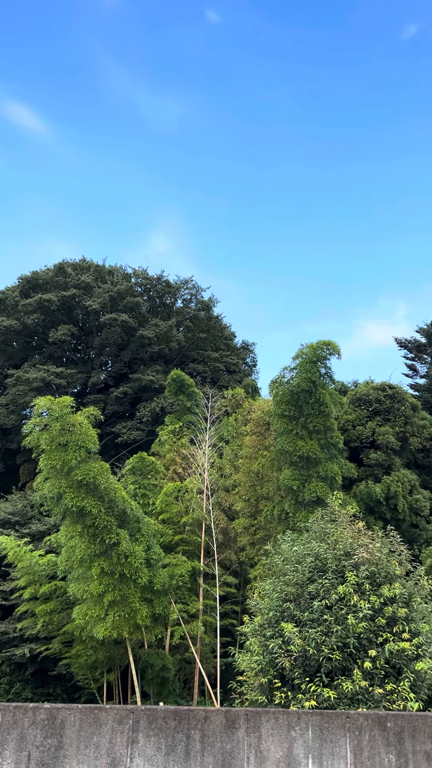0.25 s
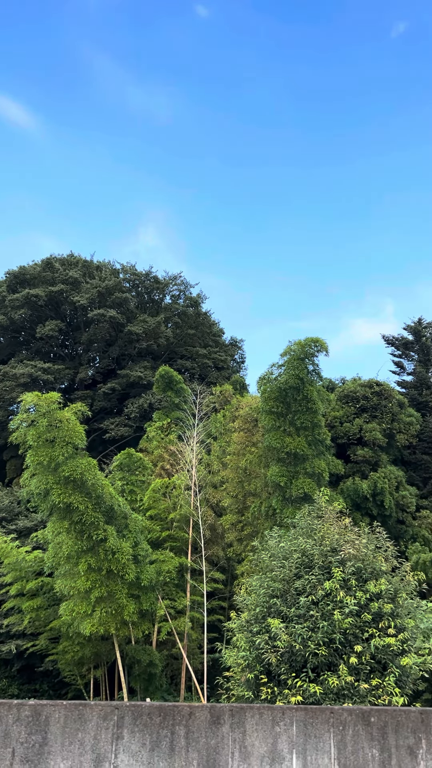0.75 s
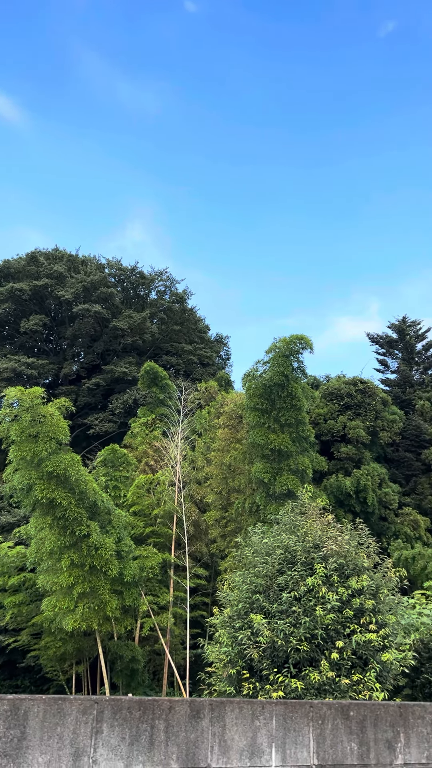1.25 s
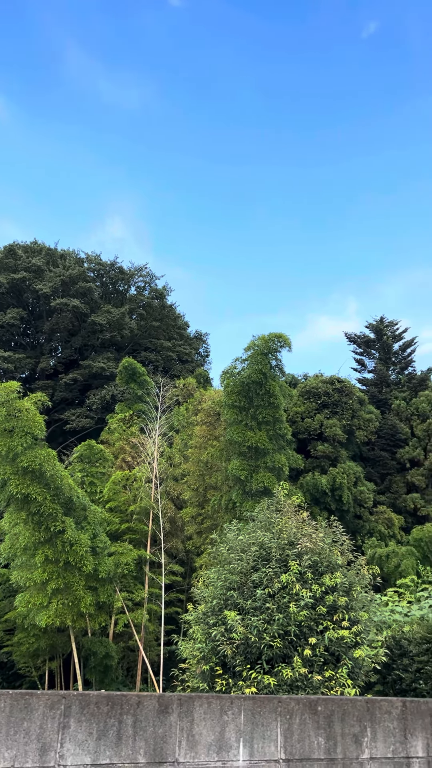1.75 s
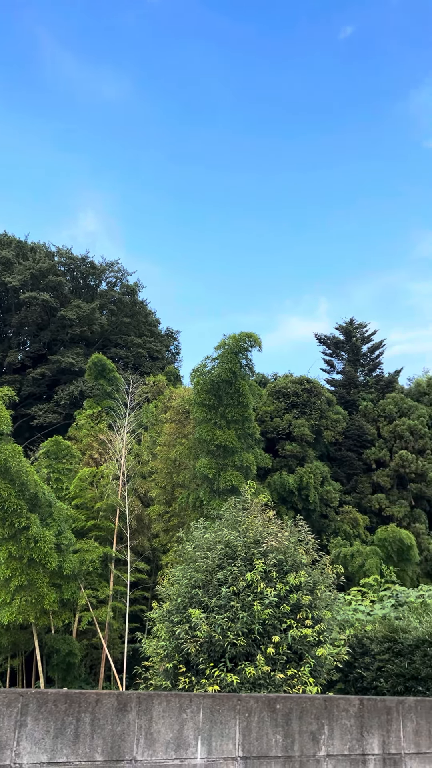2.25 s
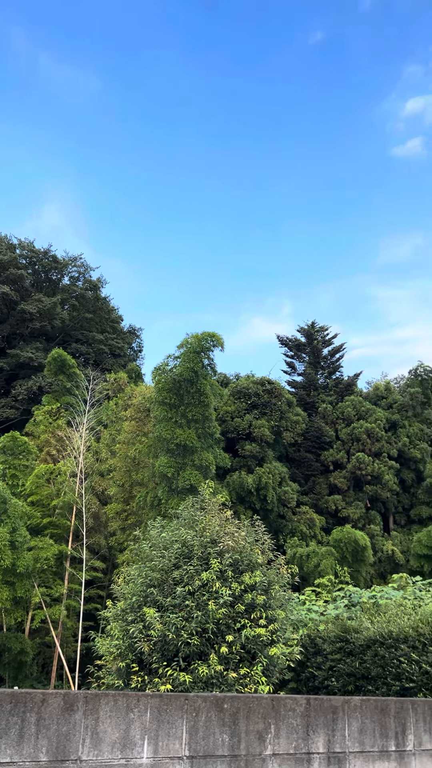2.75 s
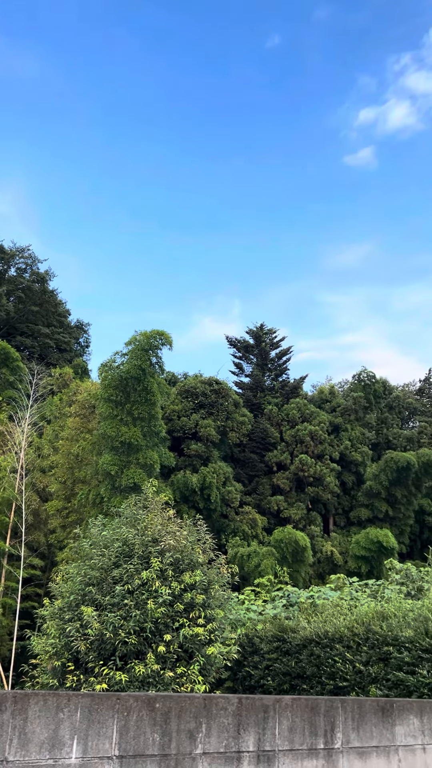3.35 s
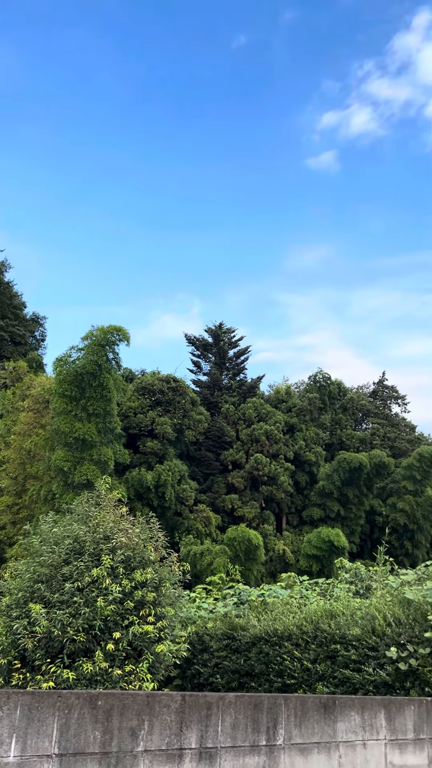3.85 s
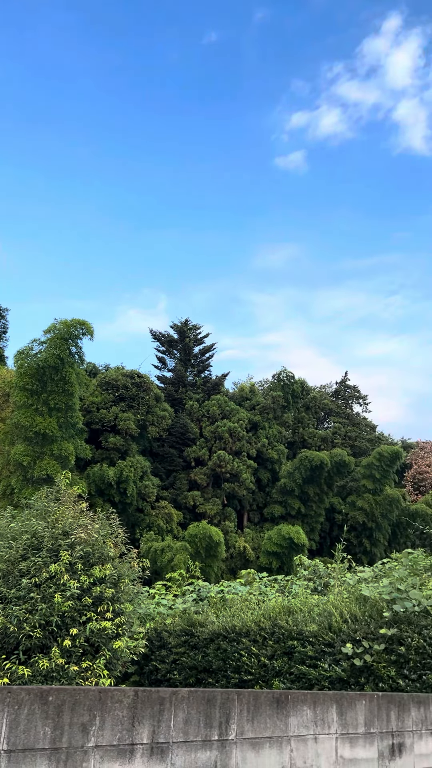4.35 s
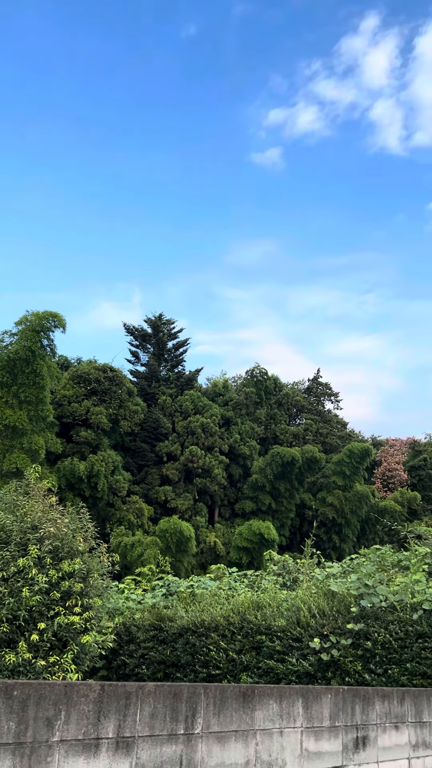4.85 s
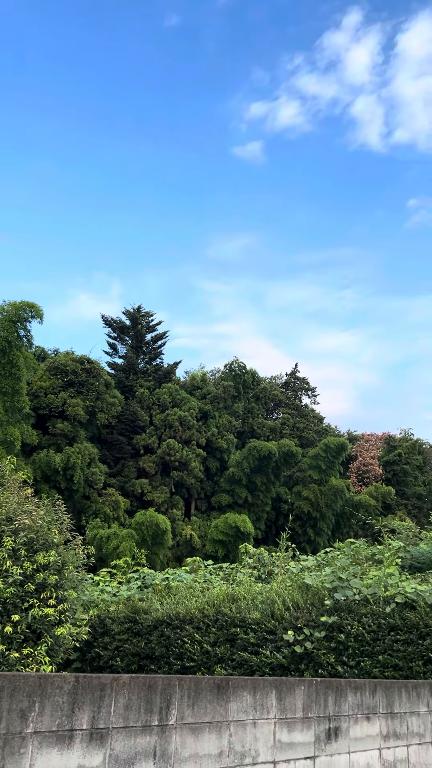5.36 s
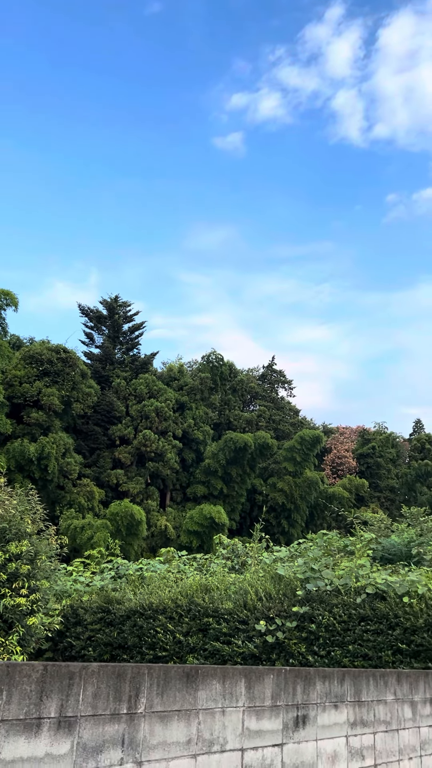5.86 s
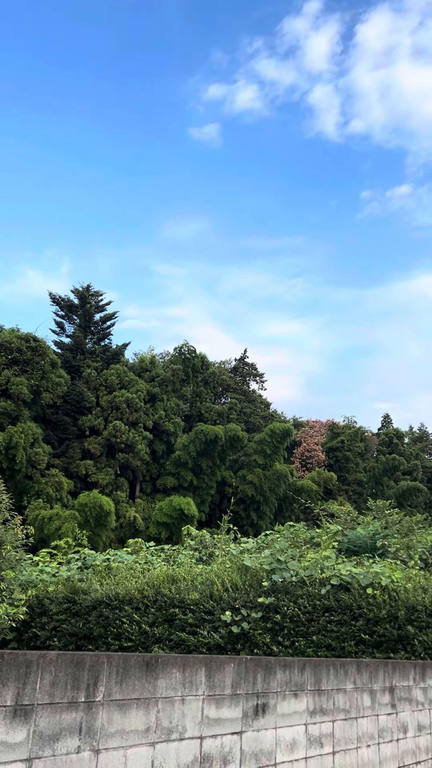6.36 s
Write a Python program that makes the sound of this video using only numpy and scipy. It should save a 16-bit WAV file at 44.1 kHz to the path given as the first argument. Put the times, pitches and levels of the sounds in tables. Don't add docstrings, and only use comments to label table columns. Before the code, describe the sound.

A smooth, bright wall of cicadas hisses steadily above a very soft low traffic hum. A nearer cicada rasps in after two seconds. Near four seconds a warbler starts a faint low whistle, swells it in pushes, then bursts into a rapid loud flourish echoing off trees. The near cicada stops and a higher, raspier one rises at the end. Open air, wide handheld stereo.

```python
import sys
import numpy as np
from scipy import signal
from scipy.fft import rfft, irfft, next_fast_len
from scipy.io import wavfile
from scipy.ndimage import uniform_filter1d

SR = 44100
rng = np.random.default_rng(int(sys.argv[2]) if len(sys.argv) > 2 else 0)


def persist_wave(psi):
    counts = np.round(np.clip(psi, -1, 1) * 32767).astype(np.int16)
    wavfile.write(sys.argv[1], SR, np.atleast_2d(counts).T)


def field_ratio(decibels):
    return 10 ** (np.asarray(decibels, dtype=float) / 20)


N = 291060
SIZE = next_fast_len(N + SR)
HZ = np.arange(SIZE // 2 + 1) * SR / SIZE
TIME = np.arange(N) / SR


def rms_one(x):
    return x / np.sqrt(np.mean(x ** 2) + 1e-20)


def at_hz(points):
    hz, value = np.transpose(points)
    return np.interp(np.log(HZ + 1), np.log(hz), value)


def filtered(x, response):
    return irfft(rfft(x, SIZE) * response, SIZE)[..., :N]


def drift(rate):
    r = np.exp(-80 * np.pi * rate / SR)
    slow = signal.lfilter([1], [1, -2 * r, r * r], rng.standard_normal(N // 40 + 2002))
    slow = rms_one(slow[2000:])
    return np.interp(np.arange(N) / 40, np.arange(len(slow)), slow)


def resonate(x, hz, width_hz):
    r = np.exp(-np.pi * width_hz / SR)
    turn = 2 * r * np.cos(2 * np.pi * hz / SR)
    return signal.lfilter([(1 - r * r) / 2, 0, (r * r - 1) / 2], [1, -turn, r * r], x)


def ease(x):
    return .5 + .5 * np.tanh(x / 2)


def moments(start, end):
    return np.linspace(start, end, int((end - start) * 1000) + 2)


def note(rows, round_s, edge_s):
    s, hz, level_db = np.transpose(rows)
    during = (TIME > s[0]) & (TIME < s[-1])
    t = TIME[during]
    width = max(round(round_s * SR), 1)
    pitch = uniform_filter1d(uniform_filter1d(np.interp(t, s, hz), width), width)
    phase = 2 * np.pi * np.cumsum(pitch) / SR
    gate = np.clip(np.minimum(t - s[0], s[-1] - t) / edge_s, 0, 1)
    level = np.sqrt(2) * gate * field_ratio(np.interp(t, s, level_db))
    out = np.zeros(N)
    out[during] = level * (np.sin(phase) + field_ratio(-38) * np.sin(2 * phase))
    return out


# time in seconds, extra level in dB.
SURGES = [
    (4.28, -1.5),
    (4.44, 7),
    (4.665, 7),
    (4.86, 7),
]


def breath(start, length, held_hz, level_db):
    entry_hz, entry_s = 150, .02
    sag_hz, sag_s = 41.8, .2
    swell_db_per_s, surge_s = 16.5, .054
    spent_s, spent_db = 4.9, -11.5
    s = moments(start, start + length)
    t = s - start
    entry = np.exp(-t / entry_s)
    hz = held_hz + entry_hz * entry - sag_hz * (1 - np.exp(-t / sag_s))
    surges_db = sum(extra_db * np.exp(-((s - at) / surge_s) ** 2) for at, extra_db in SURGES)
    shape_db = swell_db_per_s * t * (length > .5)
    shape_db = shape_db - 13 * entry + surges_db + spent_db * ease((s - spent_s) / .01)
    return np.transpose([s, hz, level_db + shape_db])


def step(multiple, length, level_db, fade_in_db):
    start, rise_s, from_hz, held_hz = 4.972, .06, 1140, 1461
    s = moments(start, start + length)
    below = np.clip(1 - (s - start) / rise_s, 0, 1)
    hz = multiple * (held_hz - (held_hz - from_hz) * below)
    return np.transpose([s, hz, level_db + fade_in_db * below ** 1.5])


def arch(start, crest, end, crest_hz, level_db):
    rise_per_s, fall_per_s = 8.32, 13
    in_db_per_s, out_db_per_s = 341, 485
    s = moments(start, end)
    before, after = np.maximum(crest - s, 0), np.maximum(s - crest, 0)
    hz = crest_hz * (1 - rise_per_s * before - fall_per_s * after)
    return np.transpose([s, hz, level_db - in_db_per_s * before - out_db_per_s * after])


def high_hook(start, peak, peak_hz, held_hz, level_db):
    drop_cycles, flick_s, flick_up = 23, .0045, .21
    db_per_octave, flick_loss_db = 31, 13.5
    s = moments(start, peak + .032)
    flick = np.exp((s - s[-1]) / flick_s)
    hz = held_hz + (peak_hz - held_hz) * np.exp(-((s - peak) * held_hz / drop_cycles) ** 2)
    loss_db = db_per_octave * np.log2(hz / held_hz) + flick_loss_db * flick
    return np.transpose([s, hz + flick_up * held_hz * flick, level_db - loss_db])


def low_hook(start, entry_hz, floor_hz, end_hz, level_db):
    fall_s, recover_s, recover_span_s, db_per_octave = .0058, .027, .0045, 19
    s = moments(start, start + .047)
    falling = floor_hz + (entry_hz - floor_hz) * np.exp(-(s - start) / fall_s)
    recovered = ease((s - start - recover_s) / recover_span_s)
    hz = falling + (end_hz - floor_hz) * recovered
    return np.transpose([s, hz, level_db - db_per_octave * np.log2(falling / floor_hz)])


# start in seconds, length in seconds, held pitch in Hz, level in dB.
BREATHS = [
    (3.72, 0.13, 1373, -70.5),
    (3.959, 0.206, 1369, -69),
    (4.191, .81, 1327, -66.5),
]
# multiple of the step's pitch, level in dB.
CREAK = [(1.5, -65), (2.0, -70)]
# start, crest and end in seconds, crest pitch in Hz, level in dB.
ARCHES = [
    (5.128, 5.153, 5.173, 1860, -37),
    (5.528, 5.555, 5.59, 2295, -30.5),
]
# start and peak in seconds, peak and held pitch in Hz, level in dB.
HIGH_HOOKS = [
    (5.232, 5.231, 3720, 2738, -29),
    (5.393, 5.4, 5100, 3490, -32),
]
# start in seconds, entry, floor and end pitch in Hz, level in dB.
LOW_HOOKS = [
    (5.263, 3100, 1791, 2273, -32.5),
    (5.432, 3776, 2340, 2512, -29.5),
]


def warbler():
    flourish = [step(.99, length=.108, level_db=-43.5, fade_in_db=-25)]
    flourish += [step(multiple, .026, level_db, 0) for multiple, level_db in CREAK]
    flourish += [arch(*row) for row in ARCHES]
    flourish += [high_hook(*row) for row in HIGH_HOOKS]
    flourish += [low_hook(*row) for row in LOW_HOOKS]
    whistle = sum(note(breath(*row), round_s=.004, edge_s=.01) for row in BREATHS)
    return whistle + sum(note(rows, round_s=.003, edge_s=.0028) for rows in flourish)


# frequency in Hz, left minus right in dB.
BIRD_SIDE = [(1200, -2), (2200, 1.5), (2800, -8), (4500, -3)]
# delay in seconds, left level in dB, right level in dB.
TRUNK_ECHOES = [
    (0.0235, -6.5, -8),
    (0.0329, -16, -10.5),
    (.055, -27, -36),
]
# frequency in Hz, gain in dB.
GROVE_COLOUR = [(1200, 3.5), (2200, 1), (4500, -0.5)]


def grove(x):
    t = TIME[:SR]
    decay = 0
    for level_db, t60_s in [(-10, .73), (-22.5, 1.52)]:
        decay = decay + field_ratio(level_db - 60 * t / t60_s) / np.sqrt(t60_s)
    build = 1 - np.exp(-t / .0054)
    tail = rng.standard_normal((2, SR)) * decay * build * np.sqrt(2 * np.log(1000) / SR)
    direct = field_ratio(at_hz(BIRD_SIDE) * [[.5], [-.5]])
    response = direct + rfft(tail, SIZE) * field_ratio(at_hz(GROVE_COLOUR))
    for delay_s, left_db, right_db in TRUNK_ECHOES:
        response = response + field_ratio([[left_db], [right_db]]) * np.exp(-2j * np.pi * HZ * delay_s)
    return filtered(x, response)


def clicks(per_s, jitter):
    phase = 2 * np.pi * np.cumsum(per_s * (1 + jitter * drift(64.8))) / SR
    return sum(np.cos(k * phase) for k in range(6, 26))


def swell_db(start, swell_s, full_db, from_db):
    since = np.maximum(TIME - start, 0)
    return full_db + from_db * np.exp(-since / swell_s)


def cicada(per_s, level_db, modes, rasp):
    train = clicks(per_s, jitter=.008) + rasp * rng.standard_normal(N)
    body = sum(field_ratio(mode_db) * resonate(train, hz, width_hz) for hz, width_hz, mode_db in modes)
    low_cut = signal.butter(4, 5780, "high", fs=SR, output="sos")
    return field_ratio(level_db + 2 * drift(36)) * rms_one(signal.sosfilt(low_cut, body))


# frequency in Hz, width in Hz, level in dB.
NEAR_BODY = [(6450, 200, 0), (6000, 700, -13), (6900, 500, -8), (11200, 500, -38)]


def near_cicada():
    level_db = swell_db(start=2.0, swell_s=.8, full_db=-48, from_db=-19)
    level_db = level_db - 40 * np.clip((TIME - 5.9) / .07, 0, 1)
    cold_per_s, warm_per_s = 465, 501
    per_s = cold_per_s + (warm_per_s - cold_per_s) * ease((TIME - 3.9) / .45)
    return cicada(per_s, level_db, NEAR_BODY, rasp=3.0)


# frequency in Hz, width in Hz, level in dB.
LATE_BODY = [(8210, 360, -16), (13000, 1700, -43)]


def late_cicada():
    start = 5.7
    level_db = swell_db(start, swell_s=.19, full_db=-43, from_db=-48)
    per_s = 490 + 8 * np.maximum(TIME - start, 0)
    return cicada(per_s, level_db, LATE_BODY, rasp=4.5)


def wide_noise(colour, likeness):
    alike = np.clip(at_hz(likeness), 0, 1)
    gains = field_ratio(at_hz(colour)) * np.sqrt([1 + alike, 1 - alike])
    shared, opposed = filtered(rng.standard_normal((2, N)), gains)
    return rms_one(np.array([shared + opposed, shared - opposed]))


# frequency in Hz, level in dB per Hz.
CHORUS_COLOUR = [(2600, -86), (3200, -52), (4000, -38.5), (4700, -31.5), (5600, -15), (6300, -12),
                 (7000, -2.5), (8000, 0.5), (8600, -4), (9200, -11), (9800, -14.5), (11700, -34.5),
                 (13000, -28.5), (15500, -33.5)]
# frequency in Hz, likeness from 0 to 1.
CHORUS_LIKENESS = [(3000, .1), (5000, .4), (5900, .87), (7000, .95), (8000, .96), (15000, .92)]
# pitch in Hz, width in Hz, level in dB, start and end in seconds.
SINGERS = [
    (5550, 50, -66, 2.4, 5.9),
    (7445, 20, -55.5, 4.3, 5.9),
    (7860, 20, -55, 3.2, 5.9),
    (8030, 45, -56, 0.0, 6.6),
    (7480, 60, -59, 0.0, 3.2),
    (8490, 40, -60, 4.8, 6.6),
    (9020, 35, -60, 0.0, 6.6),
]


def chorus():
    blur = field_ratio(-41 + .15 * drift(3.1)) * wide_noise(CHORUS_COLOUR, CHORUS_LIKENESS)
    white, lines = rng.standard_normal(N), 0
    for hz, width_hz, line_db, start, end in SINGERS:
        singing = np.clip(np.minimum(TIME - start, end - TIME) / .44 + .5, 0, 1)
        line = resonate(resonate(white, hz, width_hz), hz, width_hz)
        lines = lines + singing * field_ratio(line_db) * rms_one(line)
    return blur + lines


# start and length in seconds, clicks per second at start and end, level in dB.
FAR = [
    (0.0, .65, 362, 368, -83),
    (.55, .3, 360, 360, -84),
    (1.08, .8, 364, 362, -80),
    (2.1, .36, 390, 385, -77),
    (2.62, .4, 384, 381, -79),
    (3.15, 1.3, 368, 362, -77),
    (5.7, .5, 405, 415, -81),
]


def far_cicada():
    per_s, gain = np.full(N, 370.), np.zeros(N)
    for start, length, first, last, level_db in FAR:
        part = np.clip((TIME - start) / length, 0, 1)
        inside = (part > 0) & (part < 1)
        per_s[inside] = (first + (last - first) * part)[inside]
        gain += field_ratio(level_db) * np.sqrt(np.abs(np.sin(np.pi * part))) * inside
    train = clicks(per_s, jitter=.005) * field_ratio(3 * drift(10)) + rng.standard_normal(N)
    hz, width_hz = 4150, 1100
    body = resonate(resonate(train, hz, width_hz), hz, width_hz)
    return gain * rms_one(body) * field_ratio([[2.0], [-2.0]])


# frequency in Hz, level in dB per Hz.
HUM = [(12, -45.5), (20, -10), (35, -6.5), (54, 1.5), (109, -8.5), (207, -13.5), (367, -18.5), (399, -16),
       (454, -20.5), (1040, -23.5), (3200, -47), (4160, -56), (7040, -120)]
# frequency in Hz, likeness from 0 to 1.
HUM_LIKENESS = [(40, .9995), (60, .997), (125, .965), (250, .8), (600, .45), (1200, .6), (1800, .9),
                (2800, .1)]


def hum():
    return field_ratio(-58 + .7 * drift(3)) * wide_noise(HUM, HUM_LIKENESS)


def scene():
    cicadas = near_cicada() + late_cicada() + chorus() + far_cicada()
    return grove(warbler()) + cicadas + hum()


def low_pass(x):
    return signal.sosfilt(signal.butter(12, 15610, fs=SR, output="sos"), x)


# frequency in Hz, radians by which the left port leads.
PORTS = [(0, 0), (150, -.1), (800, -1.3), (1600, 0.0), (2400, 1.0), (2800, 1.5), (3700, .9), (5000, 2.2),
         (5800, np.pi), (6400, 3.8), (7600, 5.8), (8500, 6.7), (10050, 3 * np.pi), (12400, 4 * np.pi),
         (14900, 5 * np.pi)]


def record(dry):
    hz, lead = np.transpose(PORTS)
    half_step = .5j * np.interp(HZ, hz, lead) * [[1], [-1]]
    return low_pass(filtered(dry, np.exp(half_step)))


dry = scene()
out = record(dry)
persist_wave(out)
```